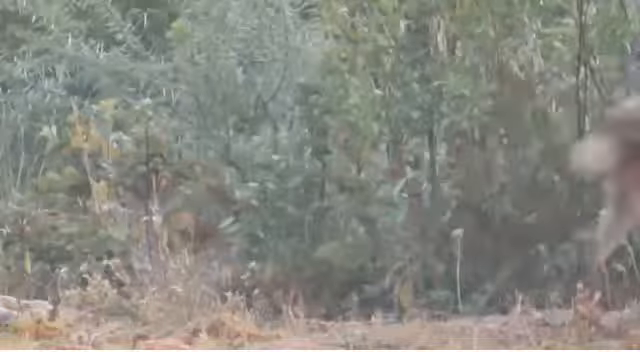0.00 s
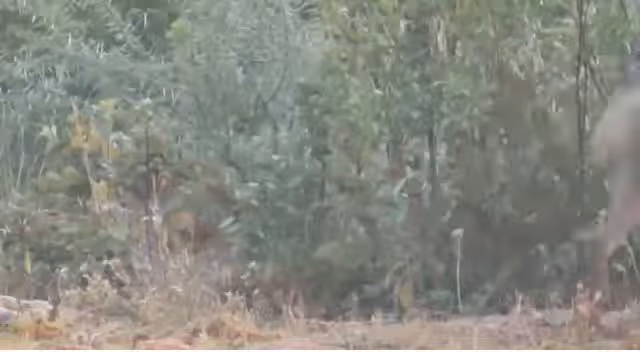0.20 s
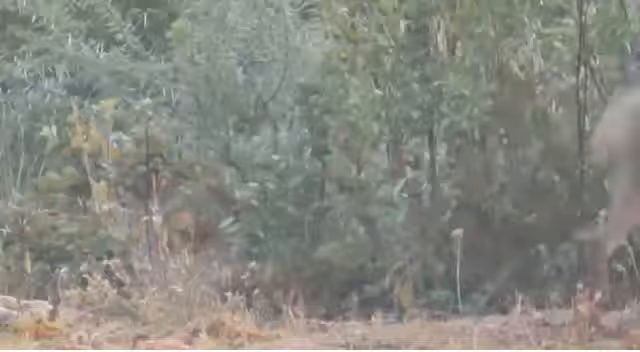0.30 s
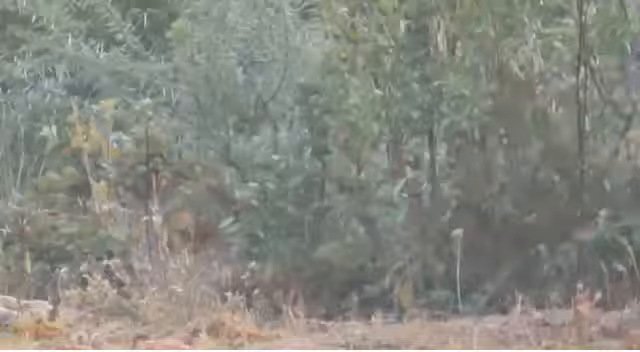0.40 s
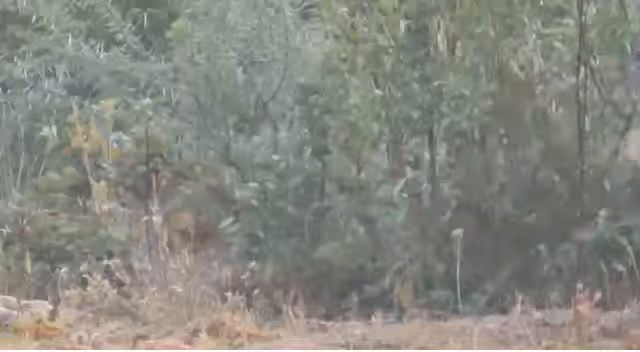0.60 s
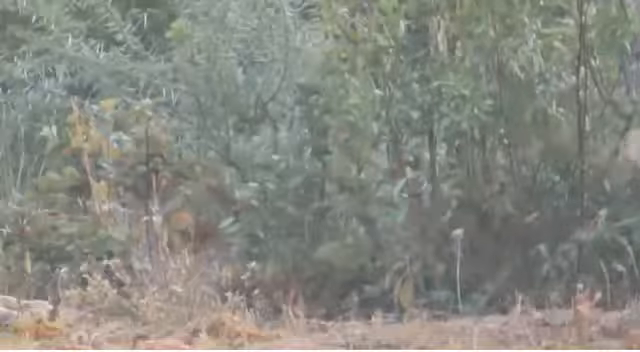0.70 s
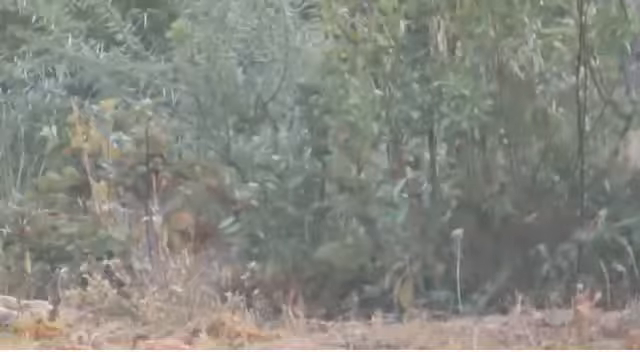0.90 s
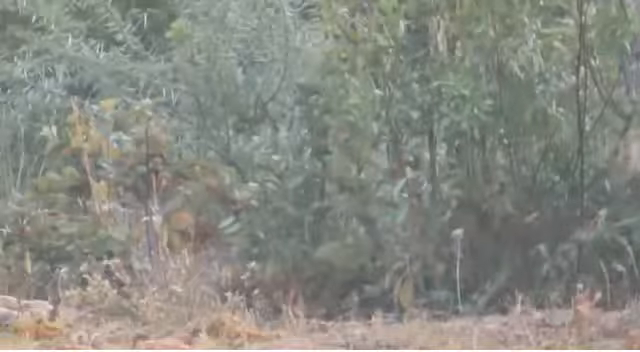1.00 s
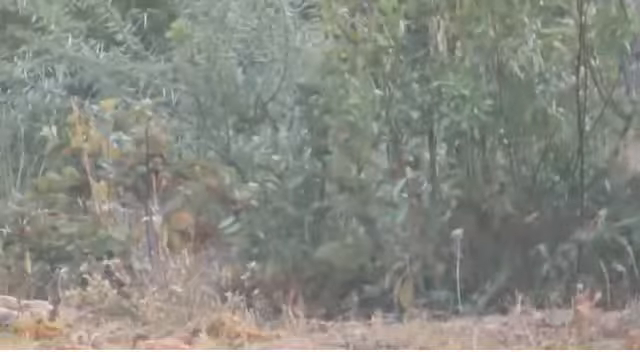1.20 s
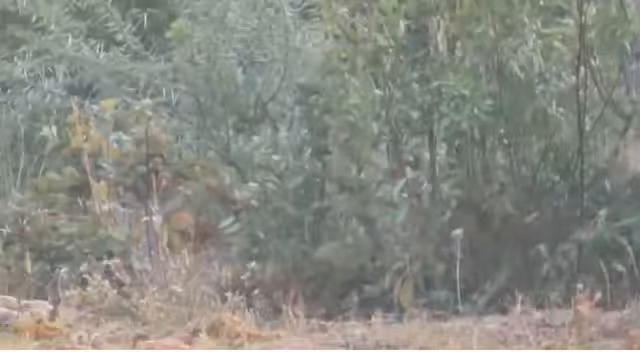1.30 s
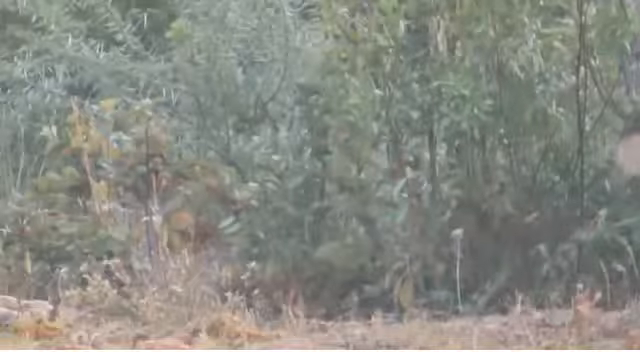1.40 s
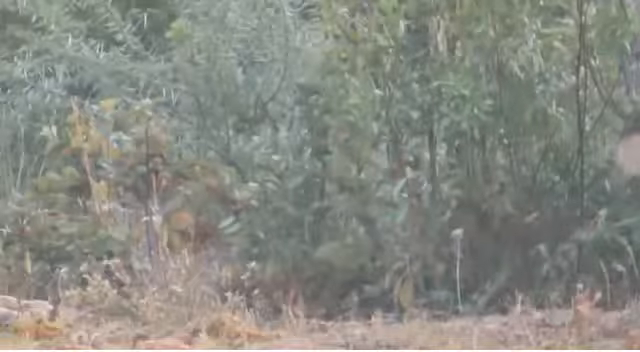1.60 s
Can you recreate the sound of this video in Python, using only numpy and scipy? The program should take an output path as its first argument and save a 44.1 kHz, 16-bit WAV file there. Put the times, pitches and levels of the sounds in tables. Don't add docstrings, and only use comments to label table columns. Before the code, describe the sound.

Small birds call outdoors. Near 0.2 s a thin arched whistle and husky squeak lead into a loud, bright nasal chirp, a twentieth of a second long, echoing off trees and bank. A faint squeak follows at 0.64 s, a softer, lower nasal chirp at 0.9 s, faint distant whistles at 1.3 s, then weak squeaks and a falling whistle around 1.5-1.67 s. Soft distant rush and low hum continue throughout.

```python
import sys
import numpy as np
from scipy import signal
from scipy.fft import rfft, irfft, next_fast_len
from scipy.io import wavfile
from scipy.ndimage import uniform_filter1d, map_coordinates

SR = 44100
rng = np.random.default_rng(int(sys.argv[2]) if len(sys.argv) > 2 else 0)


def wav_record(signal):
    frames = np.transpose(np.atleast_2d(signal))
    bounded = np.clip(frames, -1, 1)
    quanta = np.round(bounded * 32767).astype(np.int16)
    wavfile.write(sys.argv[1], SR, quanta)


def volts_from_db(level):
    exponent = np.asarray(level, float) / 20
    return 10 ** exponent


N = 74970


def unit(x):
    return x / np.sqrt(np.mean(x ** 2) + 1e-20)


def along(points, hz):
    f, value = np.transpose(points)
    return np.interp(np.log(hz + 1), np.log(f + 1), value)


def wobble(rate_hz):
    knots = rng.standard_normal(int(N * rate_hz / SR) + 4)
    return map_coordinates(knots, [np.arange(N) * rate_hz / SR])


def filtered(x, response):
    m = next_fast_len(N + SR // 2)
    return irfft(rfft(x, m) * response(np.fft.rfftfreq(m, 1 / SR)), m)[:N]


def delayed(x, delay_s):
    return np.pad(x, (int(delay_s * SR), 0))[:N]


def tone(hz, u):
    phase = 2 * np.pi * np.cumsum(hz) / SR
    return phase, np.cos(np.pi / 2 * np.clip(u, -1, 1))


# freq_hz, level_db (per Hz)
RUSH_SPECTRUM = [(21, -14.5), (35, -11), (193, -8.5), (237, -11.5), (343, -5), (1110, -5.5), (1720, -14.5),
                 (3210, -20), (8650, -35), (11200, -97.5), (19000, -120)]


def rush():
    z = signal.stft(rng.standard_normal(N), nperseg=512)[2]
    field = uniform_filter1d(rng.standard_normal(z.shape), size=6, axis=0)
    field = uniform_filter1d(field, size=12, axis=1)
    patchy = signal.istft(z * volts_from_db(1.32 * unit(field)), nperseg=512)[1][:N]
    coloured = filtered(patchy, lambda hz: volts_from_db(along(RUSH_SPECTRUM, hz)))
    level_db = -53 + 0.17 * wobble(8.22)
    return volts_from_db(level_db) * unit(coloured)


# freq_hz, level_db (rms)
HUM_LINES = [(49.8, -66), (150, -68), (197, -71)]


def hum():
    t = np.arange(N) / SR
    out = np.zeros(N)
    for hz, db in HUM_LINES:
        peak_db = db + 2.5 + 0.3 * wobble(3.5)
        out += volts_from_db(peak_db) * np.sin(2 * np.pi * hz * t)
    return out


# start_s, length_s, from_hz, to_hz, level_db
FAR_WHISTLES = [
    (.145, .045, 3250, 3200, -66),
    (1.31, .02, 2900, 2600, -67),
    (1.342, .022, 3150, 3000, -64),
    (1.557, .039, 3190, 2420, -60),
    (1.667, .008, 5200, 4500, -64),
]


def whistles():
    t, out = np.arange(N) / SR, np.zeros(N)
    for start_s, length_s, from_hz, to_hz, db in FAR_WHISTLES:
        u = np.clip((t - start_s) / length_s * 2 - 1, -1, 1)
        phase, window = tone(from_hz + (to_hz - from_hz) * (u + 1) / 2, u)
        out += volts_from_db(db) * np.sqrt(2 * window) * np.sin(phase)
    return out


# freq_hz, level_db
SQUEAK_COLOUR = [(1500, -4), (3000, 0), (4600, 0), (5700, -6), (6800, -24)]
# whistle_top_s, whistle_top_hz, squeak_pitch_hz, squeak_level_db, sag (share of pitch)
CALL_OPENINGS = [
    (0.186, 6300, 1780, -45, .035),
    (0.635, 6300, 1490, -59, .11),
    (.887, 5550, 1412, -56.5, 0.071),
    (1.488, 5340, 1452, -57, .11),
    (1.601, 6840, 1705, -53, 0.2),
]


def openings():
    half_arch_s, arch_drop = 0.0085, 0.68
    arch_db, dive_db = -17, 12
    squeak_after_s, squeak_s, husk_db = 0.0125, 0.014, 4
    t, out = np.arange(N) / SR, np.zeros(N)
    for top_s, top_hz, pitch_hz, db, sag in CALL_OPENINGS:
        u = np.clip((t - top_s) / half_arch_s, -1, 1)
        phase, window = tone(top_hz * (1 - arch_drop * u ** 2), u)
        whistle_db = db + arch_db + dive_db * u * (u + 0.5) + husk_db / 2 * wobble(400)
        out += volts_from_db(whistle_db) * window ** 0.25 * np.sin(phase)

        u = np.clip((t - top_s - squeak_after_s) / squeak_s * 2, -1, 1)
        phase, window = tone(pitch_hz * (1 + sag / 3 - sag * ((u + 1) / 2) ** 1.8), u)
        for k in range(1, 5):
            overtone_db = along(SQUEAK_COLOUR, k * pitch_hz)
            out += volts_from_db(db) * window * volts_from_db(overtone_db + husk_db * wobble(710)) * np.sin(k * phase)
    return out


def nasal(rows, rough, throat, curl, count):
    follow = 0.85
    t = np.arange(N) / SR
    s, *columns = np.transpose(rows)
    hz, db, tilt_db = [np.interp(t, s, column) for column in columns]
    phase = 2 * np.pi * np.cumsum(hz * (1 + 0.0016 * wobble(300))) / SR
    shift = (hz.max() / np.maximum.accumulate(hz)) ** follow

    k = np.arange(1, count)[:, None]
    noisy = np.interp(t, *np.transpose(rough))
    noisy = np.clip(noisy + 0.25 * (k * hz > 6800), 0, 1)
    tilt = tilt_db * np.log2(np.maximum(k * hz / 2700, 1))
    size = volts_from_db(along(throat, k * hz * shift) + tilt)

    smear = np.array([wobble(900) + 1j * wobble(900) for _ in k])
    steady_and_rough = np.sqrt(1 - noisy) + np.sqrt(noisy / 2) * smear
    lines = steady_and_rough * np.exp(1j * (k * phase - curl * k ** 2))
    voice = -(size * lines.real).sum(axis=0) / np.sqrt((size ** 2).sum(axis=0) / 2)
    fade = np.clip(np.minimum(t - s[0] + 0.0017, s[-1] + 0.012 - t) / 0.0031, 0, 1)
    return voice * volts_from_db(db) * fade


# time_s, pitch_hz, level_db, brightness_db (per octave)
FIRST_ARCH = [(.197, 731.5, -47.5, 9), (.202, 734, -28.5, 6.5), (.21, 777.5, -23.5, 1.5),
              (.219, 795.5, -21.5, 2.5), (.228, 789.7, -21.5, 1), (.236, 764.6, -23, 0),
              (.243, 685, -30, -21.5), (.25, 630, -43, -5), (.258, 656, -63, -5)]
# time_s, roughness (0-1)
FIRST_ROUGHNESS = [(.2, .35), (.208, .004), (.236, .004), (.246, .2)]
# freq_hz, level_db
FIRST_THROAT = [(790, -26), (1580, -25.5), (2370, -11.5), (3160, 0.5), (3950, -3), (5530, -9), (6320, -22),
                (7110, -31), (11000, -58.5)]


def first_arch():
    return nasal(FIRST_ARCH, FIRST_ROUGHNESS, FIRST_THROAT, curl=0.11, count=15)


# time_s, pitch_hz, level_db, brightness_db (per octave)
SECOND_ARCH = [(.9, 539.6, -55.5, 1), (.915, 548.3, -44, 0), (.926, 583, -36.5, -4.5),
               (.936, 648.2, -35.5, -1), (.944, 668.1, -29.5, 0.5), (.952, 658.4, -31.5, 2),
               (.958, 588.5, -36.5, -7), (.965, 506.5, -35, -10), (.974, 470, -63, 15)]
# time_s, roughness (0-1)
SECOND_ROUGHNESS = [(.912, .45), (.925, .07), (.95, .07), (.957, .55)]
# freq_hz, level_db
SECOND_THROAT = [(660, -17.5), (2000, -9), (2650, -1), (3300, -2), (4000, -7), (4650, -0.5), (5300, -3),
                 (6000, -16), (11000, -50)]


def second_arch():
    return nasal(SECOND_ARCH, SECOND_ROUGHNESS, SECOND_THROAT, curl=0.24, count=19)


# delay_s, level_db
BANK_ECHOES = [(0.04, -21), (.054, -21), (0.095, -25), (.19, -28.5)]
# freq_hz, t60_s
TREE_DECAY = [(600, 0.31), (3000, 0.93), (5500, 0.49), (8000, 0.68)]
# freq_hz, level_db
LEAF_COLOUR = [(700, 11), (1500, 13.5), (2400, 0.5), (3200, -2), (4000, -1.5), (5000, -2), (6500, 9),
               (9000, 3)]


def woods(x):
    slope_t60_s, trees_s = 1.53, 0.035
    hz, t, z = signal.stft(rng.standard_normal((2, SR)), SR, nperseg=256)
    tree_db = -60 * t / along(TREE_DECAY, hz)[:, None]
    slope_db = -60 * t / slope_t60_s + 0 * z[0].real
    trees, slope = signal.istft(z * volts_from_db([tree_db, slope_db]), SR, nperseg=256)[1]
    t_near = np.arange(SR // 20) / SR
    near = rng.standard_normal(SR // 20) * volts_from_db(-60 * t_near / 0.02)

    def wet(tail):
        return signal.fftconvolve(x, tail / np.linalg.norm(tail))[:N]

    far = delayed(volts_from_db(-12.5) * wet(trees) + volts_from_db(-23.5) * wet(slope), trees_s)
    for delay_s, db in BANK_ECHOES:
        far += volts_from_db(db) * delayed(x, delay_s)
    answer = filtered(far, lambda f: volts_from_db(along(LEAF_COLOUR, f)))

    ground_hz = 930
    dull = filtered(x, lambda f: 1 / (1 + (f / ground_hz) ** 8) / (1 + (ground_hz * 0.38 / (f + 1)) ** 8))
    return answer + volts_from_db(-33) * wet(near) + volts_from_db(5) * delayed(dull, 0.034)


def scene():
    background = rush() + hum()
    calls = whistles() + openings() + first_arch() + second_arch()
    return (background + calls + woods(calls))[None]


def band_limit(x):
    return signal.sosfilt(signal.butter(12, 11070, fs=SR, output="sos"), x)


def record(dry):
    low_hz, top_hz, hiss_db = 44, 7310, -97.5
    heard = filtered(dry[0], lambda hz: 1 / np.sqrt((1 + (hz / top_hz) ** 9) * (1 + (low_hz / (hz + 1)) ** 8)))
    mix = (heard + volts_from_db(hiss_db) * rng.standard_normal(N))[None]
    return band_limit(mix)


dry = scene()
out = record(dry)
wav_record(out)
```